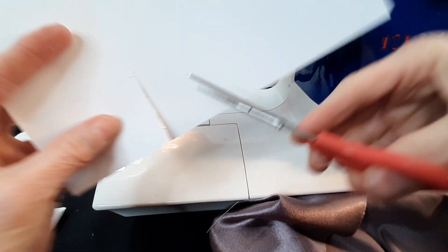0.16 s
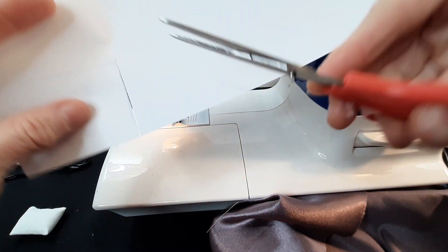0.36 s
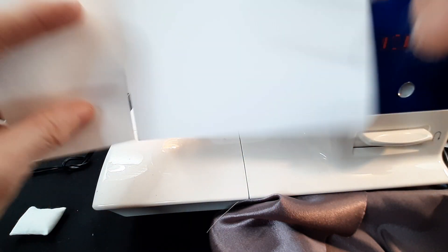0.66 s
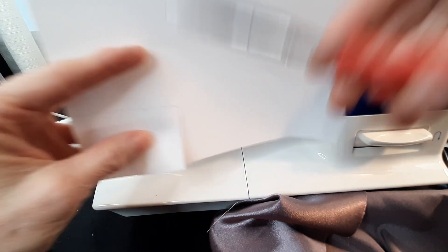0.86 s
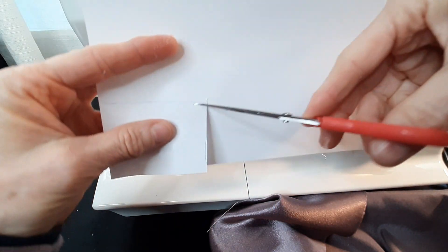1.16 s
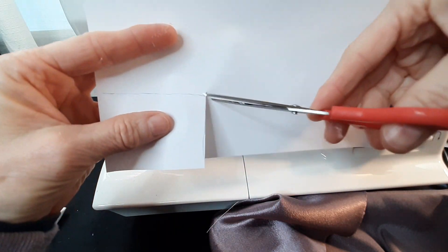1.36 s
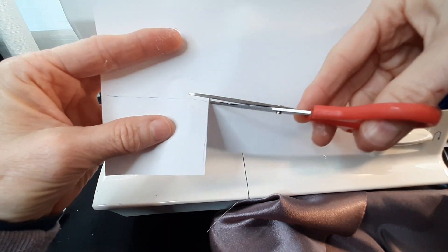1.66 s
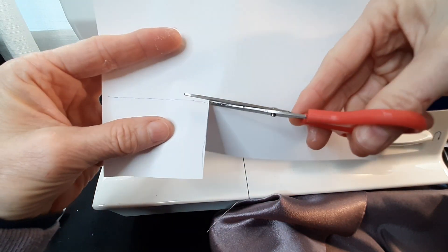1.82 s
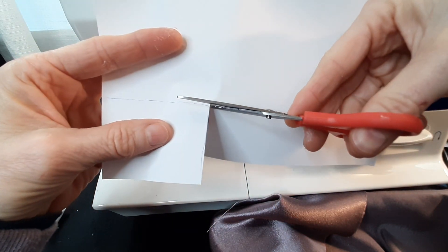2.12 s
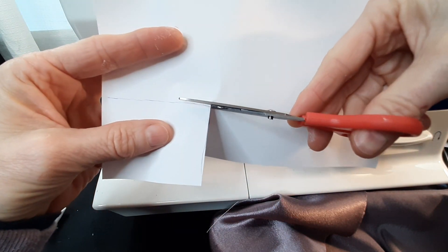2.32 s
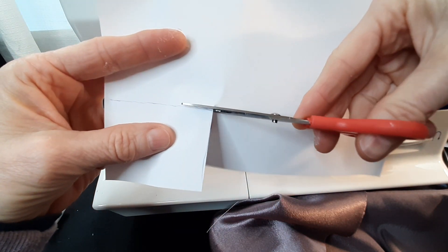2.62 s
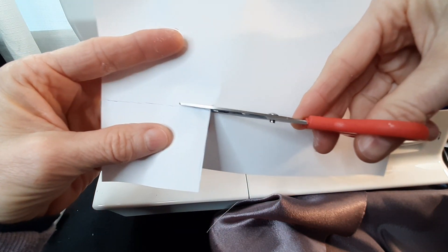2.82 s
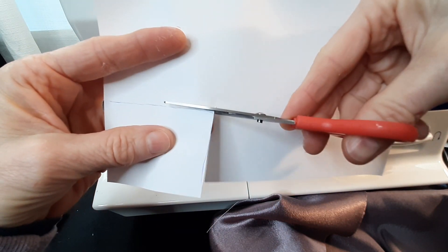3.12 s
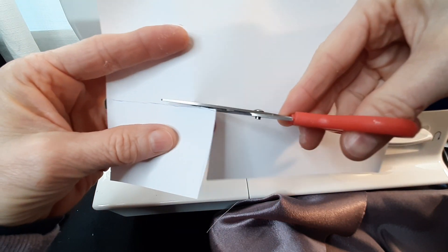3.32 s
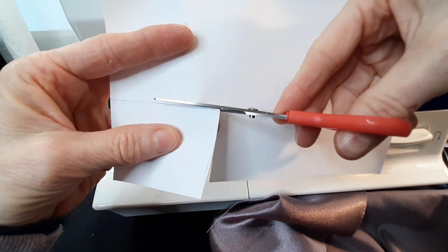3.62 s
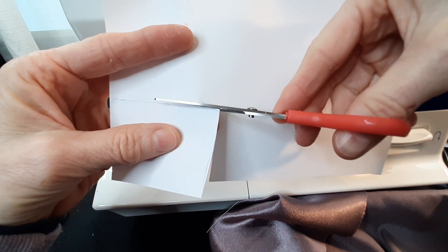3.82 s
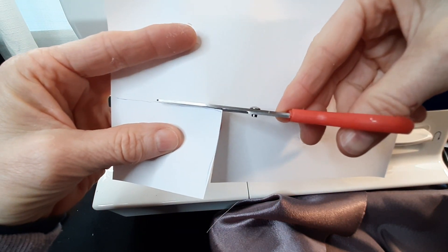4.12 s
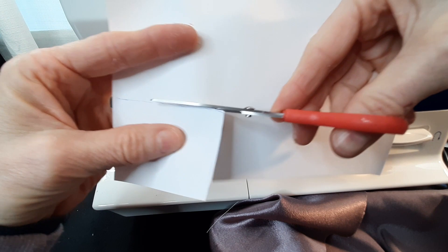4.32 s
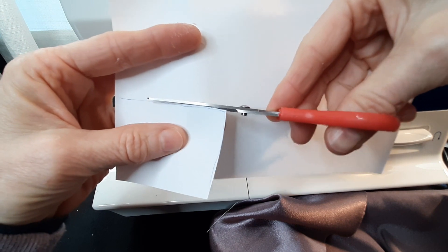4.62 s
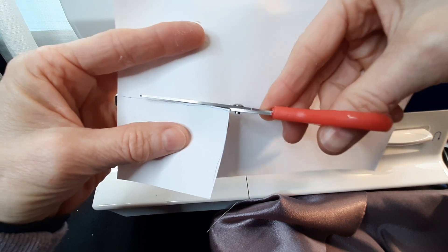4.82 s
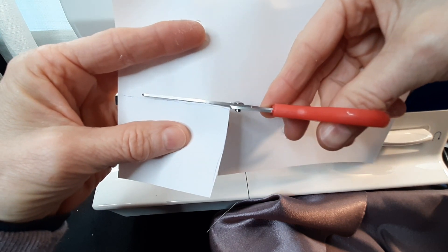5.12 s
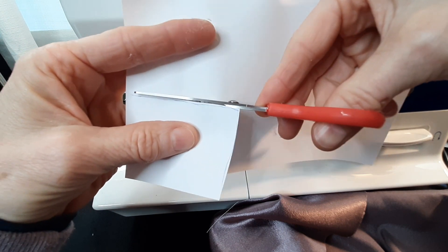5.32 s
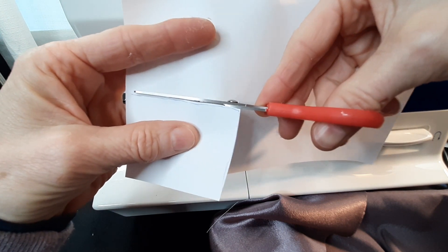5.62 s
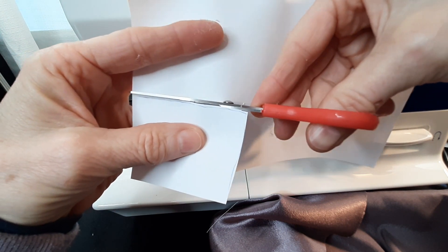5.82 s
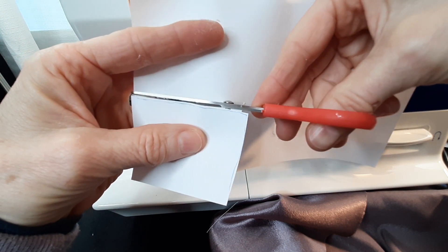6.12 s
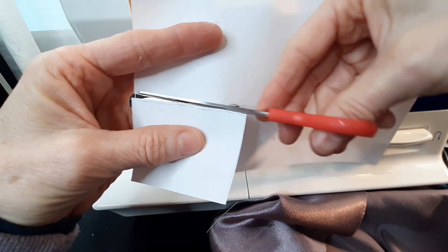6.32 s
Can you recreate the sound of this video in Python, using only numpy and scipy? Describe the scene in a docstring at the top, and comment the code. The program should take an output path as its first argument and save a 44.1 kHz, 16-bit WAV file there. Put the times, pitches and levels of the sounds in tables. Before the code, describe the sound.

Paper rustles and snaps in someone's hands, then small scissors crunch through it in seven short strokes, close up, over a faint distant engine hum.

```python
"""Small scissors work through a sheet of paper in seven strokes, close to a phone in a small room.
Each stroke is a stutter of short noise bursts, as fibres tear; the sheet snaps (decaying clicks) and
flaps (low damped modes). It slides along the blades as dense micro-clicks, and the edges squeak faintly.
Underneath lie a quiet room of shaped noise and, in two wavering tones, a low hum of what may be a
vehicle outside; its pitch climbs, sinks and climbs again."""
import sys
import numpy as np
from scipy import signal
from scipy.fft import rfft, irfft
from scipy.io import wavfile
from scipy.ndimage import uniform_filter1d

SR = 44100
rng = np.random.default_rng(int(sys.argv[2]) if len(sys.argv) > 2 else 0)


def wav_record(signal):
    """Record a signal, one row per channel, as 16-bit PCM in the file named by sys.argv[1]."""
    frames = np.transpose(np.atleast_2d(signal))
    bounded = np.clip(frames, -1, 1)
    # unit amplitude maps onto the largest positive 16-bit level
    quanta = np.round(bounded * 32767).astype(np.int16)
    wavfile.write(sys.argv[1], SR, quanta)


N = 284791
TIME = np.arange(N) / SR
FREQ = np.maximum(np.fft.rfftfreq(2048, 1 / SR), 1)  # grid of the colour curves, Hz

# strong bursts of fibres giving way between the blades, and one short catch of the blades at 4.174 s (middle
# t/s, nominal length/s, level/dB before the trim of each layer, ring f/Hz)
STRONG_BURSTS = [(2.521, 0.0062, -39, 4400), (2.544, 0.004, -46, 8500), (2.551, 0.0027, -44, 4170),
                 (2.567, 0.0059, -33.5, 4100), (2.613, 0.0057, -32.5, 3450), (2.654, 0.0046, -45, 8110),
                 (2.667, .0031, -36, 1670), (3.051, 0.0063, -41.5, 2200), (3.076, 0.0085, -31, 1750),
                 (3.096, 0.008, -37, 9500), (3.117, .006, -35, 2366), (3.138, 0.0025, -40.5, 3440),
                 (3.15, .004, -50, 3910), (3.9664, 0.0069, -47, 9700), (3.996, 0.002, -40.5, 2120),
                 (4.007, .011, -41, 2240), (4.0302, 0.0026, -36, 2320), (4.053, 0.0061, -44, 3050),
                 (4.174, 0.0039, -36, 3030), (4.456, 0.0043, -53, 9700), (4.483, 0.0046, -49, 9500),
                 (4.496, 0.034, -47.5, 2190), (4.513, 0.0097, -46, 2220), (4.569, 0.0043, -36.5, 2100),
                 (4.579, .0082, -45.5, 3160), (4.598, 0.0051, -34.5, 2110), (4.935, 0.0042, -46.5, 2290),
                 (4.953, 0.0048, -39, 3400), (4.991, 0.0047, -32.5, 2130), (5.004, 0.0055, -31, 2160),
                 (5.362, 0.0038, -48.5, 1560), (5.381, 0.006, -42.5, 3063), (5.3978, 0.0051, -32, 3040),
                 (5.408, 0.0025, -42.5, 2960), (5.4361, .0035, -29.5, 1776), (5.446, 0.0061, -28, 2500),
                 (5.4933, 0.0049, -30, 2600), (5.498, 0.0033, -39.5, 2280), (5.911, 0.002, -37, 3330),
                 (5.9526, 0.0054, -35.5, 3070), (5.9569, 0.0024, -33, 4700), (6.028, 0.0048, -35, 3740),
                 (6.037, 0.0052, -40.5, 7850), (6.082, 0.0051, -33, 7200), (6.1136, 0.0034, -30.5, 9640),
                 (6.1182, 0.0052, -29.5, 8800)]
# centres of bass, middle, presence and treble [f/Hz]
BAND_CENTRES = [350, 1350, 3850, 9500]


def cutting(count=2048):
    """The blades stick, then run through a bundle of fibres: a swell of fractures a few ms long."""
    out = np.zeros(N)
    t = (np.arange(count) - count // 2) / SR
    ring_db, ring_width = 7.5, 0.12  # width in log frequency
    for s, length, db, ring_hz, bass, treble in bursts():
        swell = np.exp(-np.abs(t / (0.62 * length)) ** 4.2)
        force = fibres(count, per_s=18000, spread_db=5.5) * swell
        colour_db = bass, 3.4 + 0.48 * treble, treble
        burst = radiate(force, s, db, ring_hz, colour_db, ring_db, ring_width, sub_db=4, air_db=-5)
        add(out, s + t[0], burst)
    return out * undb(-3.0)


def bursts():
    """Each stroke stutters: strong bursts and random small ones share the stroke's bass and treble."""
    # closing strokes of the scissors; bursts of a stroke share bass and treble, each has its own ring
    # (start t/s, length/s, mean small-burst level/dB before the layer trim,
    #  bass/dB, treble/dB relative to the middle band)
    strokes = [(2.545, 0.1, -60, -2.5, -8.5), (3.05, .1, -56, 3, -7.5), (3.968, .09, -56, -4, -6),
               (4.446, 0.17, -61, -0.5, -11), (4.919, 0.11, -55, 1.5, -6.5), (5.386, .07, -51.5, 5, -7),
               (5.905, .13, -69, 7.5, 0)]
    small_per_s, small_length_s, small_hz, scatter_db = 65, 0.0025, 2300, 3.5
    rows = []  # (middle t/s, length/s, level/dB, ring f/Hz, bass/dB, treble/dB)
    for start, length, small_db, bass, treble in strokes:
        count = int(length * small_per_s) + 1
        for k, (late, loud, high) in enumerate(rng.standard_normal((32, 3))[:count]):
            s = start + length * (k + 0.5 + 0.25 * late) / count
            ring_hz = small_hz * np.exp(0.67 * high)
            rows.append((s, small_length_s, small_db + scatter_db * loud, ring_hz, bass, treble))
    for strong in STRONG_BURSTS:
        nearest = min(strokes, key=lambda stroke: abs(stroke[0] - strong[0]))
        *_, bass, treble = nearest
        rows.append((*strong, bass, treble))
    return rows[::-1]


def fibres(count, per_s, spread_db):
    """Tiny fractures at random moments, a few much stronger than the rest."""
    strength = undb(spread_db * np.minimum(rng.exponential(size=count), 3))
    return rng.standard_normal(count) * strength * (rng.random(count) < per_s / SR)


def radiate(force, s, level_db, ring_hz, colour_db, ring_db, ring_width, sub_db, air_db):
    """A force at time s sounds through its own tilt and ring and the fixed colour of the contacts."""
    bass, presence, treble = colour_db
    bands = zip(BAND_CENTRES, (bass, 0, presence, treble))
    tilt = contour([(70, bass + sub_db), (180, bass), *bands, (15000, treble + air_db)])
    ring = ring_db / (1 + (np.log(FREQ / ring_hz) / ring_width) ** 2)
    sound = signal.fftconvolve(force, response(tilt + tautness(s) * contact_colour_db() + ring))
    rms_over_10ms = np.sqrt(np.sum(sound ** 2) / (SR / 100))  # all the energy, as if within 10 ms
    return sound * undb(level_db) / rms_over_10ms


def tautness(s):
    """The contacts ring clearly only once the hand holds the sheet taut; 0-1."""
    return np.interp(s, [0.9, 1.15], [0.35, 1])


def contact_colour_db():
    """Fixed colour of the contacts, probably mostly the phone's body and microphone."""
    # resonances and hollows, probably mostly of phone body and microphone (f/Hz, width/Hz, level/dB)
    resonances = [(562, 280, -8.5), (882, 193, 8), (1320, 190, -4), (1648, 680, 8), (2254, 180, 4),
                  (2780, 210, -1), (3144, 400, 4.5), (3900, 480, 2.5), (4680, 1000, 1), (6120, 670, 3.5)]
    return sum(db * np.exp(-2 * ((FREQ - f) / width_hz) ** 2) for f, width_hz, db in resonances)


def snapping(count=2048):
    """One sharp push and a dying chatter of the surfaces after it."""
    # the sheet buckling, blades and handles knocking
    # (t/s, nominal decay/s, level/dB before the trim, ring f/Hz, treble/dB relative to the middle band)
    snaps = [(0.089, 0.0028, -44, 1470, -7), (.166, 0.022, -49, 5700, -11.5),
             (0.2442, 0.037, -36.5, 800, -34), (0.375, 0.0043, -31.5, 625, -16),
             (0.587, 0.013, -38.5, 6120, -2), (0.644, 0.003, -52.5, 6230, 20),
             (0.7562, 0.007, -41, 1100, -35), (0.772, 0.0087, -42, 850, -53), (.79, 0.011, -42, 750, -60),
             (.8498, .0045, -44.5, 1180, -17), (0.8674, 0.021, -44.5, 970, -42),
             (1.0827, 0.0051, -49, 1520, -13.5), (1.1257, 0.0014, -31, 1030, -38),
             (1.213, .0033, -48, 4200, 1), (1.8127, 0.0018, -48, 2260, 1), (1.8194, 0.0044, -35, 1430, -27),
             (2.9123, .0026, -38.5, 1800, -14), (3.1681, 0.0031, -28.5, 3360, -4),
             (3.181, 0.0034, -41.5, 5250, -11), (3.5111, .0015, -40.5, 1510, -38),
             (3.8407, .0036, -49, 1640, -53), (3.8783, 0.0048, -37, 830, -15.5),
             (4.296, 0.0075, -42.5, 3100, -1), (4.547, .002, -55, 2960, -1),
             (4.6559, 0.0015, -50.5, 1800, -9.5), (4.7366, 0.00071, -51, 1830, -33),
             (5.1779, 0.0016, -49.5, 2190, -28), (6.12, .0017, -28, 8900, 6),
             (6.3674, 0.0028, -44.5, 860, -19)]
    slack_bass_db, taut_bass_db = 9, 5  # a slack sheet snaps with more bass than a taut one
    ring_db, ring_width, sub_db = 6, 0.14, -8
    out, t = np.zeros(N), np.arange(count) / SR
    for s, decay, db, ring_hz, treble in snaps:
        force = fibres(count, per_s=11000, spread_db=2.0) * np.exp(-t / (0.64 * decay))
        force[0] += 1.5  # the push
        bass = np.interp(tautness(s), [0, 1], [slack_bass_db, taut_bass_db])
        colour_db = bass, 4.6 + 0.68 * treble, treble
        snap = radiate(force, s, db, ring_hz, colour_db, ring_db, ring_width, sub_db, air_db=-10.0)
        add(out, s, snap)
    return out * undb(-2.53)


def sliding():
    """Paper grain catches and slips on the steel: dense micro-clicks, uneven in pressure."""
    # paper sliding on steel and fingers, one row per push
    # (start t/s, length/s, first and last level/dB of the middle band before arch and trim,
    #  bass/dB, treble/dB relative to the middle band)
    pushes = [(0, .09, -47.5, -54.5, -4, 0.5), (0.092, 0.034, -54, -59.5, 10.5, -14),
              (0.228, 0.087, -69.5, -57.5, 5, 5.5), (0.328, 0.073, -69, -62, -2, 7),
              (0.382, 0.039, -51, -55, 1.5, -1), (0.443, 0.045, -66, -62, -6, 4.5),
              (0.505, 0.098, -63.5, -54, -1, 3.5), (0.617, 0.048, -67, -69, 1, 1),
              (0.669, 0.065, -56.5, -62.5, -1, -4), (0.744, .045, -70.5, -70, 25.5, -2.5),
              (0.846, 0.15, -72, -77.5, 14, -5), (.98, 0.13, -64.5, -71.5, 3.5, -6),
              (1.109, 0.12, -54, -55, -6, -13.5), (1.256, 0.043, -66, -51.5, -14, -14.5),
              (1.333, 0.12, -53, -51.5, -8.5, -11.5), (1.518, 0.14, -68.5, -81, -7, -6),
              (1.621, 0.15, -56, -61.5, -14, -1), (1.817, 0.054, -59.5, -65, 4.5, -13.5),
              (1.899, 0.17, -66, -67, -8, 1.5), (1.962, 0.046, -68, -53.5, -25, 0),
              (2.18, 0.039, -83, -82.5, -2, 8.5), (2.44, 0.075, -82.5, -72, -4, 1.5),
              (2.546, 0.14, -83, -71, 15, -8), (2.812, 0.077, -81.5, -76, 6, 8.5),
              (2.871, .11, -65, -40, -11, 1.5), (3.059, 0.17, -60, -71.5, 7.5, -1),
              (3.267, 0.022, -56, -57, -7.5, -12.5), (3.297, 0.071, -54.5, -44.5, -11.5, -7),
              (3.369, .13, -48, -56.5, -8, -11), (3.848, 0.028, -72, -73, 9, -8),
              (3.977, 0.051, -59, -53, -4, -10), (4.269, 0.095, -61.5, -47.5, -8.5, -6),
              (4.439, 0.049, -69, -69, -1, -8), (4.562, 0.043, -52, -54.5, -5, -6),
              (4.728, 0.097, -59.5, -54.5, -12, -6.5), (4.87, .02, -65, -71, 10, -7),
              (4.908, 0.13, -69, -64, 4, -2.5), (5.134, 0.03, -69, -58, -6, -6),
              (5.164, 0.082, -56, -52.5, -11, -4.5), (5.242, 0.051, -51.5, -59.5, -10, -6.5),
              (5.355, 0.18, -73.5, -72, 14, 0), (5.61, 0.1, -64, -57.5, -5.5, -4),
              (5.711, 0.1, -55.5, -69, -10.5, -6), (5.865, 0.035, -78, -79, -6, 9.5),
              (5.89, 0.2, -71.5, -74, 5, -30), (6.128, 0.071, -53, -70, -1.5, -11),
              (6.239, 0.068, -61.5, -45, -5, -8.5), (6.325, .135, -60, -69, 1, 1.5)]
    pressure = undb(1.4 * walk(260) + 1.3 * walk(55))
    grain = fibres(N, per_s=17000, spread_db=1.4) * pressure
    grain = shifting_colour(grain, patchy_db=2.2)
    soft_top = response(contour([(6500, -1), (10500, -5.5), (15500, -12.5)]))
    loose = signal.fftconvolve(grain, soft_top)[:N]
    taut = signal.fftconvolve(loose, response(contact_colour_db()))[:N]
    rub = loose + tautness(TIME) * (taut - loose)

    power = np.zeros((len(BAND_CENTRES), N))  # overlapping pushes add in power
    for s, length, first_db, last_db, bass, treble in pushes:
        gain = push(length, first_db, last_db)
        for track, db in zip(power, (bass, 0, 0.53 * treble - 0.4, treble)):
            add(track, s, (gain * undb(db + 0.9)) ** 2)

    edges_hz = [120, 690, 2550, 5900, 17000]
    out = np.zeros(N)
    for k, track in enumerate(power):
        sos = signal.butter(4, edges_hz[k:k + 2], "band", fs=SR, output="sos")
        out += unit(signal.sosfiltfilt(sos, rub)) * np.sqrt(track)
    return out


def shifting_colour(x, patchy_db, size=512):
    """The contact travels along blade and sheet, so broad resonances come and go."""
    spectrum = signal.stft(x, nperseg=size)[2]
    patches = rng.standard_normal(spectrum.shape)
    for _ in range(2):
        patches = uniform_filter1d(patches, size=6, axis=0)  # across frequency
        patches = uniform_filter1d(patches, size=8, axis=1)  # across time
    return signal.istft(spectrum * undb(patchy_db * unit(patches)), nperseg=size)[1][:N]


def push(length, first_db, last_db):
    """Gain of one push: a quick start, a swell or fade that arches in the middle, and a short run-out."""
    attack_s, release_s, arch_db = 0.0088, 0.013, 0.5
    t = np.arange(int((length + 0.15) * SR)) / SR
    progress = np.minimum(t / length, 1)
    slope_db = first_db + (last_db - first_db) * progress
    held = undb(slope_db + arch_db * (np.sin(np.pi * progress) - 1.5))
    run_out = np.exp(-np.maximum(t - length, 0) / release_s)
    return np.minimum(t / attack_s, 1) * held * run_out


def squeaking():
    """Friction between the edges briefly excites a high, broad resonance of the blades."""
    # the steel edges squeaking faintly against each other
    # (middle t/s, half-length to 1/e in s, f/Hz, mean level/dB)
    squeaks = [(.06, 0.025, 6300, -50), (0.587, .014, 5970, -51.5), (2.617, .045, 8600, -65),
               (2.973, 0.018, 6900, -41.5), (3.083, .018, 9700, -48.5), (4.01, 0.025, 9800, -51.5),
               (4.482, 0.039, 10000, -56)]
    out = np.zeros(N)
    for s, length, hz, db in squeaks:
        clicks = fibres(N, per_s=5000, spread_db=2.2)
        ring = unit(band(clicks, hz * 0.91, hz * 1.09, order=2))
        out += ring * undb(db + 3.5 * walk(110)) * np.exp(-((TIME - s) / length) ** 2)
    return out


def flapping(count=16384):
    """A soft shove from hand or blades sets the sheet swinging; its modes differ a little every time."""
    # the loose sheet swinging after a jerk of the hands (t/s, level/dB before the trim)
    jerks = [(.376, -56), (.777, -50.5), (.86, -57), (1.821, -53), (2.975, -45.5), (6.121, -43),
             (6.31, -50)]
    # slow bending modes of the held sheet (f/Hz before detuning, t60/s, relative level/dB)
    modes = [(61.2, 0.63, -5.5), (82, 0.27, 2.5), (127.6, 0.22, -3), (185, 0.083, -1), (239, 0.054, 6.5)]
    recoil_db = -25.5  # swing after a strong burst, relative to that burst's table level, before the trim
    recoils = [(s, db + recoil_db) for s, _, db, _ in STRONG_BURSTS]
    out, t = np.zeros(N), np.arange(count) / SR
    for s, db in list(jerks) + recoils:
        detune = 1 + 0.065 * rng.standard_normal(len(modes))
        swing = np.zeros(count)
        for (f, t60, mode_db), d in zip(modes, detune):
            swing += undb(mode_db - 60 * t / t60) * np.sin(2 * np.pi * f * d * t)
        soft_start = 1 - np.exp(-t / 0.0016)
        add(out, s, undb(db + 2) * swing * soft_start)
    return out


def reflections(low_t60, high_t60, high_db, count=16384):
    """Response of the table top and the small furnished room: decaying noise, unit energy."""
    t = np.arange(count) / SR
    low = band(rng.standard_normal(count), 100, 2800, order=2) * undb(-60 * t / low_t60)
    high = band(rng.standard_normal(count), 2700, 17000, order=2) * undb(-60 * t / high_t60)
    early = 1 + 1.8 * np.exp(-t / 0.018)  # the first reflections are stronger
    tail = (low + undb(high_db) * high) * (t > 0.0025) * early
    return tail / np.sqrt(np.sum(tail ** 2))


def stereo_spread(mid, count=4096):
    """A faint stereo spread of the close sounds, mostly in the treble, from a short scattered response."""
    fade = np.linspace(1, 0, count) ** 4
    scatter = unit(rng.standard_normal(count) * fade) / np.sqrt(count)
    share = response(contour([(60, -37), (300, -34), (2500, -36), (3900, -26), (12000, -19)]))
    return signal.fftconvolve(mid, signal.fftconvolve(scatter, share))[:N]


def engine():
    """Only the two lowest firing harmonics come through the walls, wavering."""
    # distant engine (t/s, mean firing rate f/Hz, mean fundamental level/dB, mean octave level/dB)
    track = [(0, 59.4, -105, -103), (2.0, 63, -85, -71), (2.149, 68, -55.5, -85), (2.4, 73.5, -58, -65),
             (2.601, 76.9, -51, -61), (2.801, 82.45, -65.5, -59.5), (3.07, 88.14, -57, -58),
             (3.47, 93.8, -51.5, -60.5), (3.72, 91, -62, -64.5), (3.901, 87, -100, -90),
             (4.6, 68.6, -80, -88), (4.95, 74.34, -56.5, -77), (5.25, 77.4, -64, -64.5),
             (5.5, 79.9, -63, -60), (5.78, 82.2, -77, -56), (6.0, 80.6, -61, -68), (6.46, 83.5, -71, -57.5)]
    s, *columns = np.transpose(track)
    hz, first_db, second_db = (np.interp(TIME, s, c) for c in columns)
    phase = 2 * np.pi * np.cumsum(hz * (1 + 0.0062 * walk(12))) / SR
    first = undb(first_db + 1.0 * walk(22)) * np.sin(phase)
    second = undb(second_db + 1.1 * walk(12.0)) * np.sin(2 * phase)
    return np.sqrt(2) * (first + second)  # levels are rms


def room_tone():
    """Low rumble and faint hiss from shaped noise, and a thin whine from a narrow band of noise."""
    # colour of the quiet room (f/Hz, relative level per Hz/dB)
    room_colour = [(20, -36), (34, -12), (52, 1.5), (85, -0.5), (150, -5.5), (270, -13.5), (420, -24),
                   (620, -40), (950, -30), (1200, -37), (1680, -35), (2700, -41.5), (6000, -36.5),
                   (16000, -40.5)]
    air_db, whine_hz, whine_width_hz, whine_db = -58.5, 1742, 25, -84
    hz = np.maximum(np.fft.rfftfreq(N, 1 / SR), 1)
    air = unit(irfft(rfft(rng.standard_normal(N)) * undb(contour(room_colour, hz)), N))
    swell_db = 0.9 * walk(5)
    low_hz, high_hz = whine_hz - whine_width_hz / 2, whine_hz + whine_width_hz / 2
    whine = unit(band(rng.standard_normal(N), low_hz, high_hz, order=1))
    return air * undb(air_db + swell_db) + undb(whine_db) * whine


def mic_hiss():
    """Faint self-noise: the part that differs between the two microphones."""
    # colour of the hiss (f/Hz, relative level per Hz/dB)
    hiss_colour = [(60, -14), (700, -15), (3200, -20), (5000, 3.5), (16000, 5)]
    hiss = signal.fftconvolve(rng.standard_normal(N), response(contour(hiss_colour)))[:N]
    return undb(-83.5) * unit(hiss)


def undb(db):
    """Decibels to gain."""
    return 10 ** (np.asarray(db) / 20)


def unit(x):
    """Scale to rms 1."""
    return x / np.sqrt(np.mean(x ** 2))


def add(track, s, sound):
    """Mix a sound into the track at time s."""
    i = max(int(s * SR), 0)
    track[i:i + len(sound)] += sound[:max(N - i, 0)]


def contour(points, hz=FREQ):
    """Join (Hz, dB) points on a log-frequency axis."""
    f, db = np.transpose(points)
    return np.interp(np.log(hz), np.log(f), db)


def response(db):
    """Causal (minimum-phase) impulse response of a gain curve over FREQ, by folding its cepstrum."""
    cepstrum = irfft(np.log(undb(db)))
    half = len(cepstrum) // 2
    cepstrum[1:half] *= 2
    cepstrum[half + 1:] = 0
    return irfft(np.exp(rfft(cepstrum)))


def band(x, lo_hz, hi_hz, order=3):
    """Band-pass."""
    edges_hz = [lo_hz, min(hi_hz, SR / 2 - 100)]
    return signal.sosfilt(signal.butter(order, edges_hz, "band", fs=SR, output="sos"), x)


def walk(rate):
    """Smooth random wander with a spread near 1, drawn anew at rate per second."""
    k = max(int(SR / rate), 1)
    steps = np.repeat(rng.standard_normal(N // k + 1), k)
    return unit(uniform_filter1d(steps, k)[:N])


def scene():
    """Scissors and sheet close to the two microphones, over the room and the distant engine."""
    close = cutting() + snapping() + sliding() + squeaking() + flapping()
    room = signal.fftconvolve(close, reflections(low_t60=0.32, high_t60=0.28, high_db=-2.5))[:N]
    mid = close + undb(-14) * room + engine() + room_tone()
    side = stereo_spread(close) + mic_hiss()
    return np.array([mid + side, mid - side])


def record(dry):
    """The phone cuts the deep bass (below 33 Hz) and the top (above 15.9 kHz)."""
    lean = signal.sosfilt(signal.butter(3, 33, "high", fs=SR, output="sos"), dry)
    return signal.sosfiltfilt(signal.ellip(8, 0.1, 50, 15900, fs=SR, output="sos"), lean)


dry = scene()
out = record(dry)
wav_record(out)
```